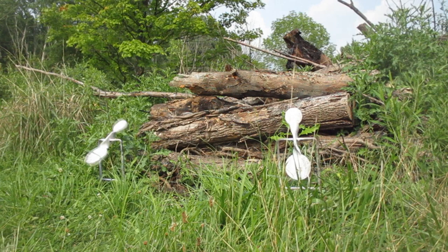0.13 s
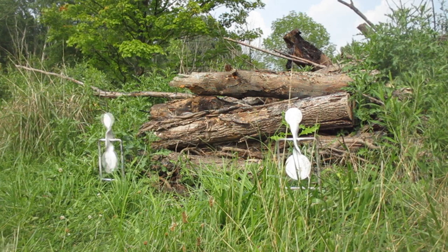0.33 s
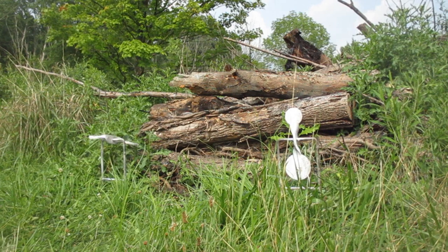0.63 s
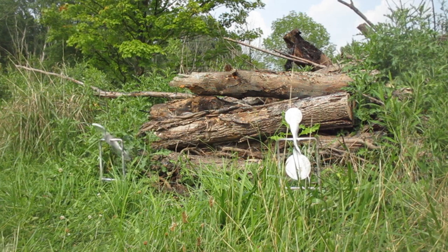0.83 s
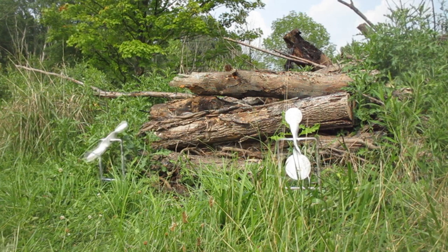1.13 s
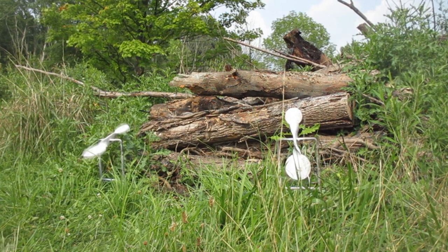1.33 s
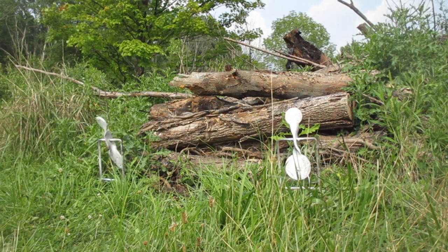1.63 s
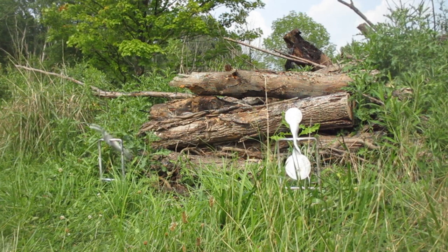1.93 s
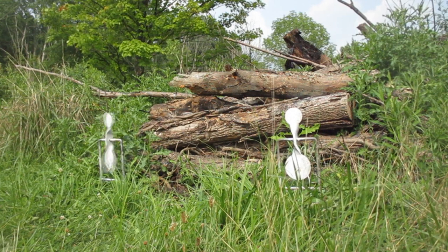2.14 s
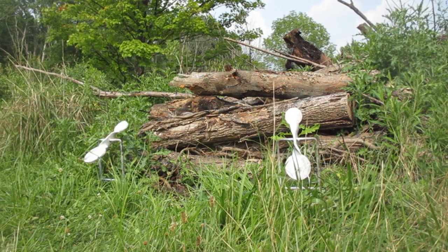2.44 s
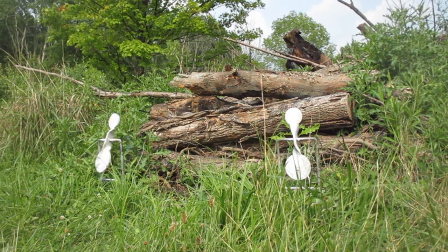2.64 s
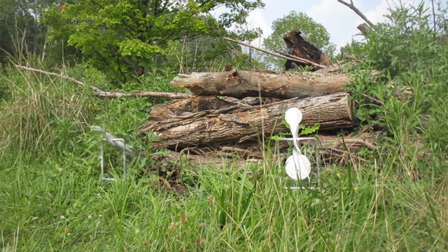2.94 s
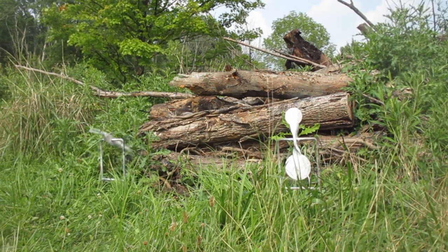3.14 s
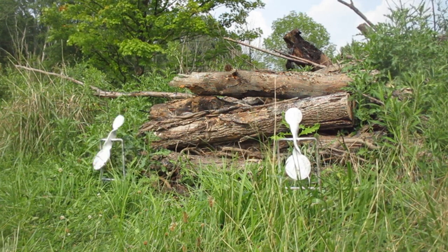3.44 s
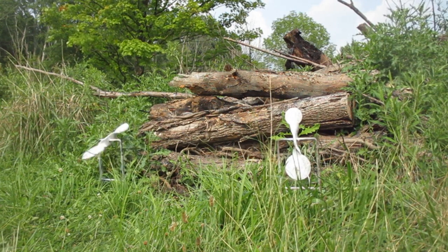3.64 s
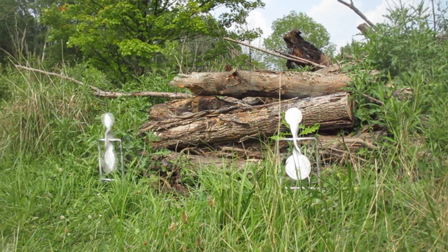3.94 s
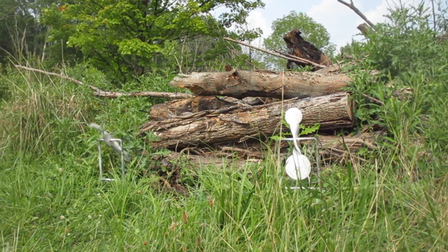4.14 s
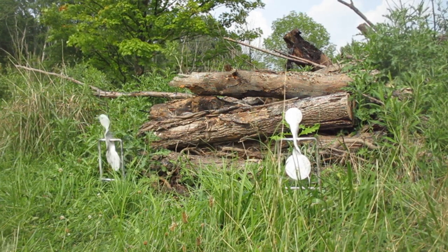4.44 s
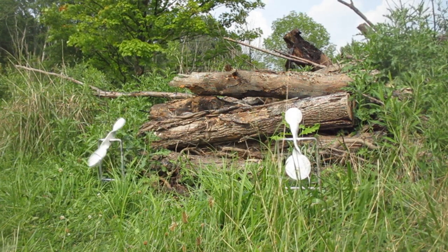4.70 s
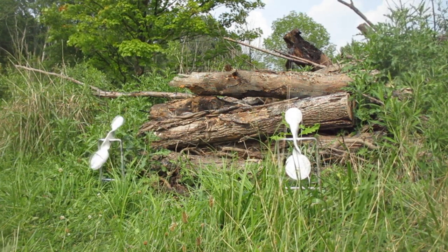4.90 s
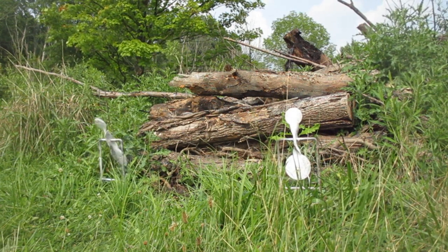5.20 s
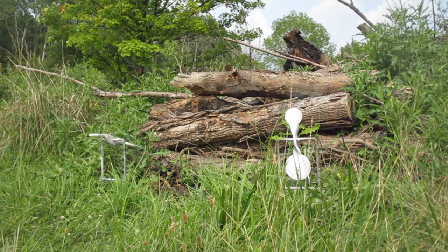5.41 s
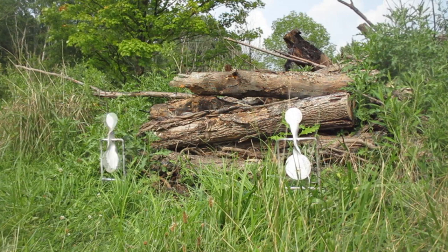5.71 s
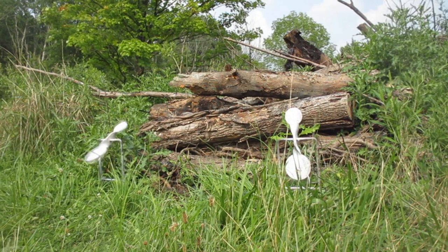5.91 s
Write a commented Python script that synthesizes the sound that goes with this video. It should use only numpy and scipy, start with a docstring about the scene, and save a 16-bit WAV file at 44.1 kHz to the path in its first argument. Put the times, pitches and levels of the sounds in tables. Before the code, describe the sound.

It opens almost silent: a soft breeze, leaves, a very faint high insect trill and three thin, sagging bird notes in the first 0.4 s. At 0.5 s a revolver shot cracks, hard enough to overload the single microphone, and about 15 ms later the bullet clangs on a spinning steel paddle, its bright ring pulsing as it turns. Short slaps return from logs and trunks within 0.3 s, and the woods roll on, duller, while the level slowly recovers. Around 1.2 s three tiny metallic cocking ticks sound; from 1.4 to 2.3 s low wind thumps buffet the microphone. The second shot and clang come at 2.9 s, with the same rolling echo. More ticks follow near 3.7 s and a light wind bump at 4.4 s. The third shot hits at 5.3 s with a differently coloured clang, alongside another wind thump; a faint metal knock at 5.8 s lies under the fading tail.

```python
"""A thin bird note repeats faintly over insects and a breeze, then the first of three revolver shots cracks.
Place: a clearing among trees. Each bullet rings a spinning steel paddle; logs and woods throw the blast back.
Distance: the echo slaps come 81 to 259 ms late, some 28 to 89 m of extra path; the woods roll on after.
Microphone: one, overloaded by each blast and bumped by gusts; the hammer is cocked between shots.
Blasts are pressure pulses and noise, steel is decaying sines, echoes and wind are shaped noise."""
import sys
import numpy as np
from scipy import signal
from scipy.fft import rfft, irfft
from scipy.io import wavfile
from scipy.ndimage import uniform_filter1d

SR = 44100
rng = np.random.default_rng(int(sys.argv[2]) if len(sys.argv) > 2 else 0)


def master_out(mix):
    """Clip the mix to full scale and print it as 16-bit PCM to the path in sys.argv[1]."""
    frames = np.transpose(np.atleast_2d(mix))
    ceiling = np.clip(frames, -1, 1)
    pcm = np.round(ceiling * 32767).astype(np.int16)
    wavfile.write(sys.argv[1], SR, pcm)


N = 267246  # length of the scene [samples]
T = np.arange(2 * SR) / SR  # time axis of one event [s]


def amp(db):
    """Decibels to gain."""
    return 10 ** (np.asarray(db) / 20)


def unit(x):
    """Scales to rms 1."""
    return x / np.sqrt(np.mean(x ** 2) + 1e-20)


def read(points, hz, axis=1):
    """Interpolates one column of a table along log frequency."""
    columns = np.transpose(points)
    return np.interp(np.log(hz + 1), np.log(columns[0] + 1), columns[axis])


def add(mix, start_s, sound):
    """Mixes a sound in at a start time, cut off where the mix ends."""
    part = mix[max(round(start_s * SR), 0):][:len(sound)]
    part += sound[:len(part)]


def cut(x, hz, kind="low", order=2):
    """Causal low-pass or high-pass."""
    sos = signal.butter(order, min(hz, SR / 2 - 1), kind, fs=SR, output="sos")
    return signal.sosfilt(sos, x)


def colour(x, points):
    """Causal minimum-phase filter with the given spectrum."""
    size = 4096
    log_gain = np.log(amp(read(points, abs(np.fft.fftfreq(size, 1 / SR)))))
    # the Hilbert transform of the log gain gives the minimum phase
    spectrum = np.exp(np.conj(signal.hilbert(log_gain)))
    taps = np.fft.ifft(spectrum).real[:size // 2]
    return signal.fftconvolve(x, taps)[:len(x)]


def swell(start_s, rise_s):
    """Opens smoothly from start_s over rise_s seconds."""
    return np.sin(np.pi / 2 * np.clip((T - start_s) / rise_s, 0, 1)) ** 2


def ringing(hz, t60):
    """One mode: a sine that falls 60 dB in t60 seconds."""
    return np.exp(-np.log(1000) * T / t60) * np.sin(2 * np.pi * hz * T)


def flutter(rate_hz=22):
    """A smooth random wobble of rms 1."""
    noise = rng.standard_normal(2 * len(T))
    return unit(cut(noise, rate_hz, order=3)[len(T):])  # second half: the filter has settled


def scatter(table, patchy_db=0):
    """Many small reflections: noise whose bands die at their own speed, in uneven clumps."""
    hz, t, z = signal.stft(rng.standard_normal(len(T)), SR, nperseg=256)
    clumps = uniform_filter1d(rng.standard_normal(z.shape), size=18, axis=0)
    clumps = unit(uniform_filter1d(clumps, size=3, axis=1))
    start_db = read(table, hz)[:, None]
    t60 = read(table, hz, axis=2)[:, None]
    db = start_db - 60 * t / t60
    return signal.istft(z * amp(db + patchy_db * clumps), SR)[1][:len(T)]


# still air and leaves around the microphone, relative spectrum: (frequency [Hz], density [dB per Hz])
AIR_SPECTRUM = [(88, -29.5), (150, -1.5), (286, -5), (315, -11), (368, -8.5), (854, -15), (941, -13),
                (1100, -16.5), (1190, -15), (3350, -24), (5460, -28), (8900, -31.5), (16000, -43)]


def meadow(hush_db=-64, insect_hz=8750, width_hz=400, insect_db=-87, throb_hz=14):
    """A faint even hush of coloured noise with a thin, throbbing insect trill of narrow-band noise."""
    hz, t = np.fft.rfftfreq(N, 1 / SR), np.arange(N) / SR
    spectrum = rfft(rng.standard_normal(N)) * amp(read(AIR_SPECTRUM, hz))
    hush = amp(hush_db) * unit(irfft(spectrum, N))
    buzz = cut(rng.standard_normal(N), width_hz) * np.sin(2 * np.pi * insect_hz * t)
    throb = 1 + .5 * np.sin(2 * np.pi * throb_hz * t)
    return hush + amp(insect_db) * unit(buzz * throb)


def bird(count=3, start_s=.052, every_s=.112, note_s=.08, top_hz=5520, sag_hz_per_s=1500,
         waver_hz=110, level_db=-80):
    """A distant bird: evenly spaced thin sine notes, each sagging and wavering in pitch."""
    out = np.zeros(N)
    t = np.arange(0, note_s, 1 / SR)
    for k in range(count):
        hz = top_hz - sag_hz_per_s * t + waver_hz * flutter(rate_hz=120)[:len(t)]
        tone = np.sin(2 * np.pi * np.cumsum(hz) / SR)
        note = np.sin(np.pi * t / note_s) * tone
        add(out, start_s + k * every_s, amp(level_db) * unit(note))
    return out


# gusts on the microphone: (time of the peak [s], relative level [dB])
GUSTS = [(.33, -49.5), (1.92, -34.5), (2.8, -51), (3.52, -50), (4.36, -44.5), (5.22, -44), (5.82, -53)]


def wind_strength(rise_db_per_s=37.5, fall_db_per_s=46.5, breeze_db=-64):
    """Gain of the wind: all gusts share one pace of building and one of dying, over a steady breeze."""
    t = np.arange(N) / SR
    gusts_db = [peak_db - np.maximum(rise_db_per_s * (s - t), fall_db_per_s * (t - s)) for s, peak_db in GUSTS]
    return np.sqrt(amp(breeze_db) ** 2 + (amp(gusts_db) ** 2).sum(0))


def eddy(hz, width=0.46, swirl_db=-11, swirl_s=0.0089):
    """A soft pressure swing with a finer swirl of noise around it."""
    t = T[:SR // 10] - .025  # the swing peaks 25 ms in
    swing = np.cos(2 * np.pi * hz * t) / np.cosh(np.minimum(abs(hz * t) / width, 20)) ** 2
    swirl = unit(cut(rng.standard_normal(len(t)), 2 * hz, order=5)) * np.exp(-(t / swirl_s) ** 2)
    return swing + amp(swirl_db) * swirl


# the strongest eddies that bump the microphone, each peaking 7 ms after its time:
# (time [s], level of the swing [dB], frequency of the swing [Hz])
BUMPS = [(1.385, -33, 90), (1.685, -28.5, 133), (1.776, -22, 192), (1.791, -24.5, 98), (1.864, -22, 128),
         (1.957, -19.5, 85.8), (2.117, -20.5, 60.3), (2.268, -29, 59.6), (4.324, -35, 69.5),
         (4.443, -28.5, 111.2), (5.254, -19.5, 98)]


def wind(rumble_db=-1, rumble_hz=90, buffet_db=-42, buffet_hz=190, growth=1.4, lumpy_db=4.5, lump_rate_hz=12):
    """Low, lumpy turbulence follows the gusts and brightens in strong ones; single eddies bump the microphone."""
    strength = wind_strength()
    lumps = amp(lumpy_db * unit(cut(rng.standard_normal(N), lump_rate_hz)))

    def turbulence(top_hz):
        low_noise = cut(rng.standard_normal(N), top_hz, order=4)
        return unit(lumps * cut(low_noise, 30, "high"))

    out = amp(rumble_db) * strength * turbulence(rumble_hz)
    # the brighter buffeting grows faster than the wind itself
    out += amp(buffet_db) * (strength / strength.max()) ** growth * turbulence(buffet_hz)
    for s, db, hz in BUMPS:
        add(out, s - .018, amp(db) * eddy(hz))
    return out


# clicks of hammer and cylinder: (time [s], relative level [dB])
CLICKS = [(1.1735, -53.5), (1.2131, -52), (1.2374, -50), (3.6443, -55), (3.685, -50.5), (3.71, -52)]
# colour of one click: (frequency [Hz], relative level [dB], t60 [s])
CLICK_COLOUR = [(2000, -28.5, .04), (7000, -15, 0.043), (10535, -5.5, 0.019), (13030, -11, 0.013),
                (14400, -18, 0.033), (16000, -34, .04)]


def cocking(level_db=-12):
    """Small bright ticks of dying noise as the hammer is drawn back and the cylinder locks."""
    out = np.zeros(N)
    for s, db in CLICKS:
        click = unit(scatter(CLICK_COLOUR)[:SR // 20]) / 2
        add(out, s, amp(db + level_db) * click)
    return out


# scatter from the first trees: (frequency [Hz], level [dB], t60 [s])
TREES = [(76.78, -24, 0.88), (300, -21.5, .55), (800, -13.5, 0.63), (2000, -9.5, 0.47), (3440, -8.5, 0.46),
         (5000, -10.5, 0.4), (9800, -14.5, 0.24), (16000, -26, 0.22)]
# the long roll of the deep woods: (frequency [Hz], level [dB], t60 [s])
WOODS = [(80.16, -30.5, 3.5), (250, -14.5, 0.85), (432, -28, 1.7), (754, -24.5, 2.5), (1270, -20, 2.145),
         (2440, -22, 1.787), (4470, -27, 1.38), (9900, -29, 0.71), (16000, -35, 0.33)]


def forest():
    """The first trees answer brightly; the deep woods roll on, duller."""
    first_trees = scatter(TREES, patchy_db=4.5) * swell(0.054, 0.022)
    deep_woods = scatter(WOODS, patchy_db=1.5) * swell(0.012, 0.2)
    return first_trees + deep_woods


# slaps from the log pile and tree trunks: (delay [s], level [dB], low edge [Hz], high edge [Hz])
SLAPS = [(.0810, -18.5, 548, 1607), (.0990, -20.5, 700, 1870), (.1055, -33, 700, 1900),
         (.1455, -20.5, 150, 4500), (.2590, -32, 198, 2500)]


def slaps(smear_s=0.0056):
    """Rough bark smears each echo into a short burst of band-limited noise."""
    out = np.zeros(len(T))
    for delay, db, low_hz, high_hz in SLAPS:
        burst = unit(cut(cut(rng.standard_normal(len(T)), high_hz), low_hz, "high"))
        envelope = swell(0, 0.000348) * np.exp(-T / smear_s)
        add(out, delay, amp(db) * burst * envelope)
    return out


# scatter from the shooter, grass and logs: (frequency [Hz], level [dB], t60 [s])
NEAR = [(60, -0.5, 0.094), (169, 4, 0.21), (280, 5.5, 0.12), (445, 8, 0.14), (946, 9, 0.1),
        (1430, 6.5, 0.068), (2170, 4.5, 0.097), (3380, 0.5, 0.092), (5300, 0, 0.13), (10010, -13.5, 0.36),
        (16000, -18.5, .09)]


def near_scatter():
    """The nearest surfaces return a dense, patchy wash that opens within milliseconds."""
    return scatter(NEAR, patchy_db=-3.5) * swell(0.00067, 0.0057)


# near paths of the blast to the microphone, levels before the ground's colour:
# (delay [s], level [dB], length of the pressure pulse [s], treble edge [Hz])
PATHS = [(0, 38, .00013, 15000), (.00085, 23, 0.0002, 4000), (.0034, 6.5, 0.00011, 2997),
         (.0120, 6, .0007, 1206), (0.0139, 12, 0.00021, 1820), (.0212, 2, 0.00055, 1800)]
# grassy ground colours the blast and thins its low middle: (frequency [Hz], gain [dB])
GROUND = [(70, 4.5), (160, -5), (240, -1.5), (330, 3), (450, -7), (630, -2.5), (950, 3.5), (1250, 6),
          (1650, 9), (2050, -0.5), (3200, 3), (8000, -3)]


def blast(thump_hz=250, thump_db=11, thump_t60=0.011, jet_db=11, jet_s=0.0017):
    """A shock front and its suction arrive by every path; the gas jet adds a rip of noise and a low thump."""
    out = amp(jet_db) * rng.standard_normal(len(T)) * np.exp(-T / jet_s)
    for delay, db, length, edge_hz in PATHS:
        u = T[:SR // 20] / length
        pulse = (1 - u) * np.exp(-u)  # pressure first, then suction
        add(out, delay, amp(db) * cut(pulse, edge_hz))
    out = colour(out, GROUND)
    add(out, .0014, amp(thump_db) * ringing(thump_hz, thump_t60))
    return out


# lead splashing off the steel: (frequency [Hz], relative level [dB], t60 [s])
SPLASH = [(300, -13.5, 0.057), (1214.6, -5, 0.028), (3300, -3.5, 0.03), (6000, 1, 0.032),
          (9300, -4.5, 0.048), (15300, -10.5, 0.019)]


def splash():
    """The bullet breaks up on the plate: a short bright spray of noise."""
    return scatter(SPLASH)


# the swinging paddle touches its frame: (time [s], relative level [dB])
KNOCKS = [(5.822, -53)]
# modes of the paddle that the knock sets ringing: (frequency [Hz], relative level [dB], t60 [s])
KNOCK_MODES = [(3440, 7, 0.17), (5370, 10, 0.084), (6750, -1.5, 0.31), (7850, -5.5, 0.23), (9500, -14, 0.27)]


def frame_knocks():
    """A soft touch sets some of the paddle's modes ringing."""
    out = np.zeros(N)
    for s, db in KNOCKS:
        modes = sum(amp(mode_db) * ringing(hz, t60) for hz, mode_db, t60 in KNOCK_MODES)
        add(out, s, amp(db) * swell(0, 0.015) * modes)
    return out


# pitches of the paddle's modes: frequency [Hz]
PADDLE_HZ = [1130, 1631, 2266, 3429, 3553, 5405, 5575, 5795, 6735, 7437, 7450, 8420, 9163, 9543, 11220,
             11716, 12025, 12772, 12812, 13234, 13930, 14190, 15550]
# the same modes in order; where the bullet lands sets their strength:
# (t60 [s], build-up [s], level in shot 1 [dB], level in shot 2 [dB], level in shot 3 [dB])
PADDLE_MODES = [(3.67, .55, -54, -57, -37), (1.2, .07, -25.5, -25.5, -36), (.3, .01, -25, -27.5, -37),
                (0.16, .003, -10.5, -12, -10.5), (0.41, 0.057, -5.5, -15, -27),
                (.24, 0.007, -16, -22.5, -16), (0.092, .008, -23.5, -26, -21.5),
                (0.17, 0.005, -18, -21, -12), (0.48, .008, -23, -29.5, -35), (0.37, 0.017, -3, -25, -3),
                (0.66, 0.014, -9, -9, -12.5), (0.23, .006, -34.5, -20.5, -49.5),
                (0.29, .006, -22.5, -26, -17.5), (0.19, 0.0025, -19, -17, -13.5),
                (0.15, 0.005, -27, -29, -11.5), (0.46, 0.0046, -24, -24.5, -20),
                (.2, .005, -23.5, -20.5, -22), (0.15, 0.0059, -32.5, -32, -10.5),
                (.85, .006, -46.5, -39.5, -37.5), (.2, .004, -27, -22.5, -13.5),
                (.22, .005, -21, -29.5, -24), (.24, .005, -26, -30.5, -25), (.15, .005, -26, -28.5, -28)]
# the paddle after each hit: (spin [turns per s], starting angle [turns])
SPINS = [(2.1, -.01), (2.5, -.025), (2.1, -.02)]


def paddle(strike, flutter_db=2):
    """The struck plate rings, loudest when its face turns toward the microphone; modes flutter as it spins."""
    depth_db = flutter_db * swell(0, 0.032)
    ring = np.zeros(len(T))
    for hz, (t60, build, *levels_db) in zip(PADDLE_HZ, PADDLE_MODES):
        gain = amp(levels_db[strike] + depth_db * flutter())
        ring += gain * ringing(hz, t60) * swell(0, build)
    spin, angle = SPINS[strike]
    facing = np.cos(2 * np.pi * (spin * T + angle))
    return ring * np.hypot(.2, facing)  # edge-on it still sounds at 0.2


def ring_among_trees(ring):
    """The first trees scatter the paddle's ring: convolution with decaying noise of unit energy."""
    trees = scatter(TREES) * swell(0.014, 0.037)
    return signal.fftconvolve(ring, trees / np.linalg.norm(trees))[:len(T)]


# the shots: (time [s], blast gain [dB], delay of the bullet's clang [s], splash gain [dB])
SHOTS = [(.5106, 1.5, 0.017, 0.5), (2.9439, 1.5, 0.014, 3.5), (5.2792, 1, 0.02, -4)]


def shots(ring_wet_db=-17, stir=0.58):
    """Blast, splash and ring; the clearing answers each shot alike, but for its stirring leaves."""
    out = frame_knocks()
    report = blast() + slaps() + near_scatter()
    still = forest()
    for strike, (s, db, clang_delay, splash_db) in enumerate(SHOTS):
        woods = (still + stir * forest()) / np.hypot(1, stir)
        add(out, s, amp(db) * (report + woods))
        ring = paddle(strike)
        clang = ring + amp(ring_wet_db) * ring_among_trees(ring) + amp(splash_db) * splash()
        add(out, s + clang_delay, clang)
    return out


def scene():
    """Everything at one microphone."""
    return (meadow() + bird() + wind() + cocking() + shots())[None]


def record(dry, range_db=10, recovery_db_per_s=17, band_hz=15950):
    """Gain control dives at each blast and creeps back; the peaks still clip; then the band limit."""
    x = cut(dry[0], 24, "high", order=1)
    over_db = np.clip(20 * np.log10(abs(x) + 1e-9), 0, range_db)
    # a running maximum on a rising slope gives instant attack and steady recovery
    climb = recovery_db_per_s * np.arange(N) / SR
    duck_db = np.maximum.accumulate(over_db + climb) - climb
    clipped = np.clip(x * amp(-duck_db), -.95, .95)
    return cut(clipped, band_hz, order=24)[None]


dry = scene()
out = record(dry)
master_out(out)
```